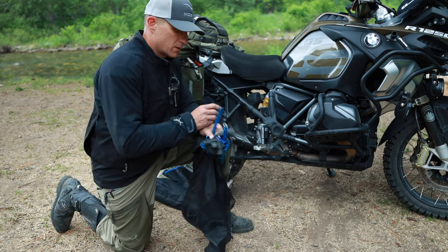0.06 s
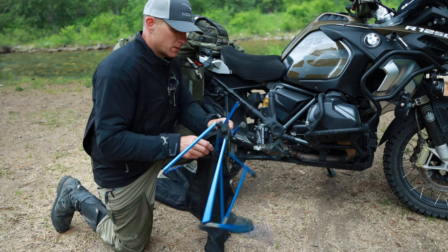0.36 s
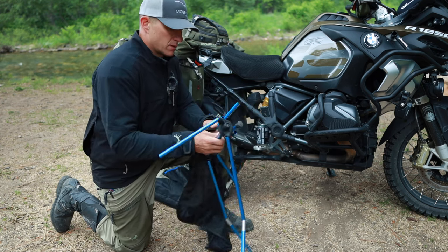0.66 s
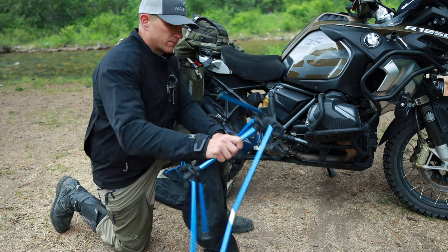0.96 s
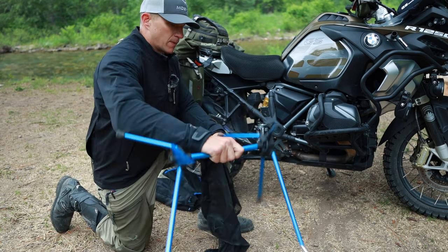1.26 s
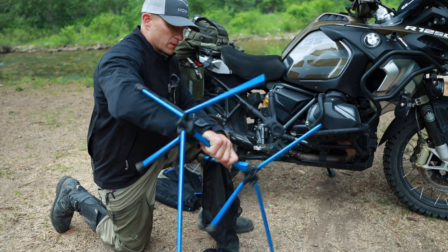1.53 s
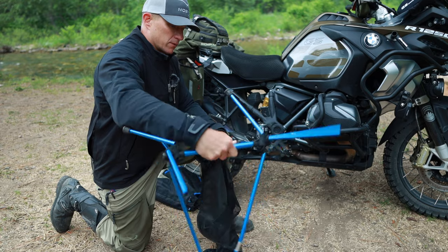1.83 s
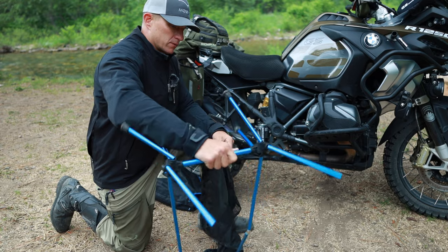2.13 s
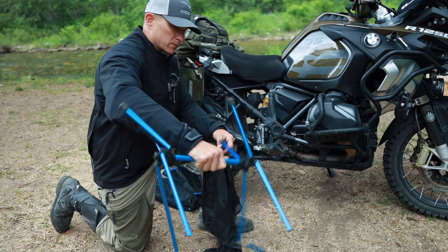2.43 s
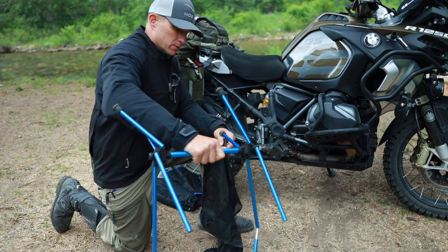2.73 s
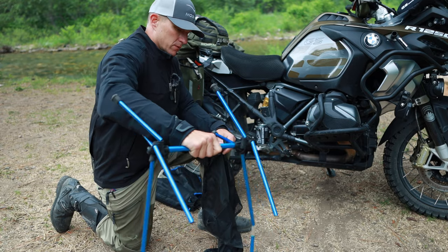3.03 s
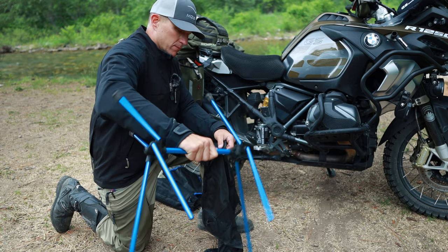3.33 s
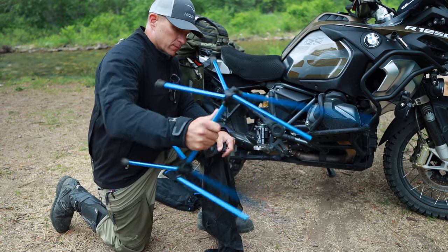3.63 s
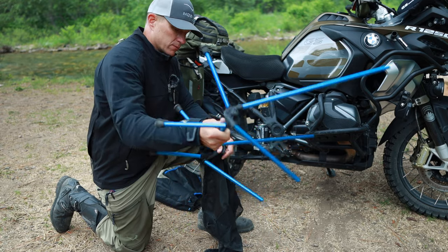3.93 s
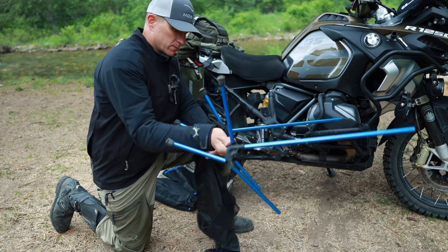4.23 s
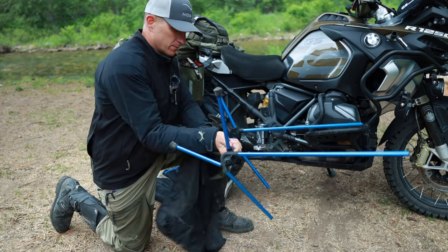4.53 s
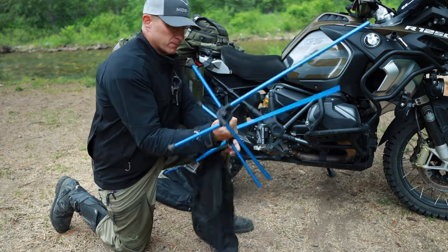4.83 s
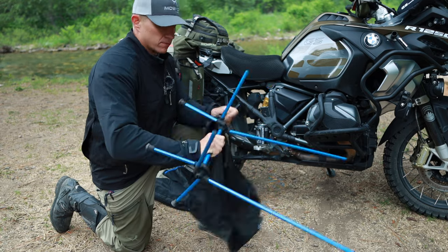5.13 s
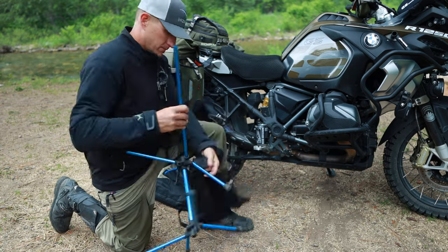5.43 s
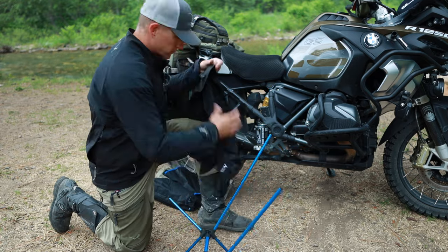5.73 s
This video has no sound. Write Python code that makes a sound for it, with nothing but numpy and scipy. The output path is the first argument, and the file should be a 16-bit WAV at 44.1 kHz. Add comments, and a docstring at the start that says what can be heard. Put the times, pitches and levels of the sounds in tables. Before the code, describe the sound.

A camp chair's frame comes out of a nylon sack with a rustle, brief metallic hisses and light taps. Its aluminium tubes then snap into their sockets one after another, with sharp, dry clicks and a faint ring. After a short lull, cloth rustles again while boots and a knee scuff and thud softly on the ground. The microphone is very close, in a quiet outdoor hush.

```python
"""A brief ringing hiss, a rustle of nylon and light taps: a camp chair's frame leaves its sack, close by.
As it is shaken open, the shock cord snaps each aluminium tube into its socket with a dry click and a
faint ring, echoed by a parked motorcycle. Later, boots and a knee thud softly on the ground.
One microphone stands outdoors in a quiet open-air hush, so near that the loudest clicks overload it."""
import sys
import numpy as np
from scipy import signal
from scipy.fft import rfft, irfft
from scipy.io import wavfile
from scipy.ndimage import uniform_filter1d

SR = 44100
rng = np.random.default_rng(int(sys.argv[2]) if len(sys.argv) > 2 else 0)


def bounce(signal):
    """Save signal as a 16-bit WAV file at the path given by the first command-line argument."""
    frames = np.transpose(np.atleast_2d(signal))
    limited = np.clip(frames, -1, 1)
    pcm = np.round(limited * 32767).astype(np.int16)
    wavfile.write(sys.argv[1], SR, pcm)


N = 263395
TIME = np.arange(N) / SR


def gain_of(db):
    """Decibels to amplitude."""
    return 10 ** (np.asarray(db) / 20)


def unit_rms(x):
    """Scales to rms 1."""
    return x / np.sqrt(np.mean(x ** 2) + 1e-20)


def unit_burst(x):
    """Scales a burst to the energy of 10 ms at rms 1."""
    return x / np.sqrt(np.sum(x ** 2) / (.01 * SR) + 1e-20)


def level(curve):
    """Amplitude at every sample from rows of t/s, level/dB."""
    return gain_of(np.interp(TIME, *np.transpose(curve)))


def add(mix, s, sound):
    """Mixes a sound in at time s."""
    part = mix[max(round(s * SR), 0):][:len(sound)]
    part += sound[:len(part)]


def band(x, low_hz, high_hz, order=2):
    """Causal band-pass."""
    return signal.sosfilt(signal.butter(order, [low_hz, high_hz], "band", fs=SR, output="sos"), x)


def resonate(x, hz, width_hz):
    """One resonance of the given width."""
    r = np.exp(-np.pi * width_hz / SR)
    return signal.lfilter([1, 0, -1], [1, -2 * r * np.cos(2 * np.pi * hz / SR), r * r], x)


def coloured(x, colour):
    """Shapes a spectrum by rows of f/Hz, level/dB; the result has rms 1."""
    hz, db = np.transpose(colour)
    bin_db = np.interp(np.log(np.fft.rfftfreq(N, 1 / SR) + 1), np.log(hz), db)
    return unit_rms(irfft(rfft(x) * gain_of(bin_db), N))


def dying(t, t60):
    """Falls 60 dB in t60 seconds."""
    return np.exp(-np.log(1000) * t / t60)


def waver(depth_db, span_s):
    """A gain that wanders at random."""
    drift = uniform_filter1d(rng.standard_normal(N), int(span_s * SR))
    return gain_of(depth_db * unit_rms(drift))


def rough_noise(depth_db, span_s):
    """Noise of uneven strength."""
    return unit_rms(waver(depth_db, span_s) * rng.standard_normal(N))


def swells(rows, skew, fullness):
    """One arch of amplitude per row: skew under 1 peaks early, fullness over 1 holds the level."""
    out = np.zeros(N)
    for s, length, db in rows:
        arch = abs(np.sin(np.pi * np.linspace(0, 1, round(length * SR)) ** skew))
        add(out, s, gain_of(db) * arch ** (1 / fullness))
    return out


# Brief ringing hisses close by, some just before and around a loud click: t/s, length/s, level/dB
HISSES = [(0, .04, -36.5), (.065, 0.14, -46.5), (.216, .085, -38), (.461, 0.028, -39), (.688, 0.04, -46.5),
          (.895, .08, -55.5), (2.472, .025, -46), (3.222, 0.021, -44.5), (3.267, 0.038, -40.5),
          (3.305, 0.036, -51.5)]
# The resonances in that hiss: f/Hz, width/Hz, level/dB
HISS_MODES = [(2190, 110, -5), (2710, 170, 0.5), (3730, 240, -2), (4350, 260, -9.5), (4800, 250, -4.5),
              (5700, 67, -6), (6760, 70, -17), (7340, 70, -13.5), (9900, 260, -11.5), (14100, 250, -8),
              (15230, 380, -6.5)]


def ringing_hiss():
    """Rough noise sings in metallic resonances, in short swells."""
    noise = rough_noise(depth_db=3.5, span_s=.0015)
    song = sum(gain_of(db) * unit_rms(resonate(noise, hz, width)) for hz, width, db in HISS_MODES)
    return swells(HISSES, skew=.55, fullness=1.4) * unit_rms(song)


# A faint rustling hiss that sinks around the loud clicks and then returns: t/s, level/dB
RUSTLE = [(0, -75), (.75, -57), (1.15, -53.5), (1.55, -67), (2.15, -61), (2.6, -66.5), (3.55, -80),
          (3.72, -64.5), (4.4, -61), (5.97, -61.5)]
# A hand or sleeve drags over the nylon near the microphone: t/s, length/s, level/dB
RUBS = [(0, 0.017, -39.5), (.04, 0.038, -46), (.07, 0.065, -43), (.12, 0.048, -49), (.255, .055, -48),
        (.605, 0.04, -57), (.79, .09, -51), (1.42, .03, -49), (2.005, .03, -64), (2.362, 0.029, -50.5),
        (2.388, 0.029, -48), (2.468, .028, -43), (2.53, 0.035, -51), (2.572, 0.021, -47),
        (3.34, 0.031, -52), (4.43, 0.29, -55), (4.935, .035, -50), (5.04, .11, -54.5), (5.195, 0.097, -50),
        (5.27, 0.11, -53.5), (5.46, 0.068, -52.5), (5.612, 0.054, -44.5), (5.66, 0.11, -54),
        (5.82, 0.18, -51)]
# The nylon's spectrum at the microphone: f/Hz, level/dB
CLOTH_COLOUR = [(100, -18), (400, 1), (900, 3.5), (2200, 4.5), (4000, 0.5), (6000, 0), (8000, -3),
                (12000, -6), (14500, -4.5), (16000, -15)]


def cloth(crackles_per_s=35, crackle_db=15):
    """Rubbed and shaken nylon hisses and its creases crackle, over a faint wavering rustle."""
    friction = rough_noise(depth_db=2.2, span_s=.0015)
    creases = (rng.random(N) < crackles_per_s / SR) * rng.uniform(.2, 1, N)
    crackle = signal.oaconvolve(creases, dying(TIME[:512], t60=.0065))[:N] * rng.standard_normal(N)
    rustle = level(RUSTLE) * waver(depth_db=1, span_s=.073)
    rubs = swells(RUBS, skew=.6, fullness=2.1)
    envelope = np.sqrt(rustle ** 2 + rubs ** 2 + cloth_shake() ** 2)
    return envelope * coloured(friction + gain_of(crackle_db) * crackle, CLOTH_COLOUR)


# The open air all around the microphone: t/s, level/dB
AIR = [(0, -49), (.65, -46.5), (.8, -49.5), (1.3, -52.5), (3.55, -52.5), (3.75, -52), (5.97, -49)]
# Its spectrum: f/Hz, level/dB
AIR_COLOUR = [(15, -85.5), (25, -46.5), (108, -14), (145, -6.5), (200, -4.5), (363, 0), (427, -4),
              (560, -7), (695, -9), (988, -10.5), (5140, -23.5), (5880, -27.5), (7110, -29.5),
              (11300, -33.5), (16000, -37)]


def air():
    """A quiet outdoor hush, strongest in the low middle."""
    return level(AIR) * coloured(rough_noise(depth_db=1, span_s=.036), AIR_COLOUR)


def contact(chatter_s):
    """One sharp impact, then a brief chatter of metal."""
    t = TIME[:2048]
    rattle = rng.standard_normal(len(t)) * dying(np.maximum(t - chatter_s, 0), t60=.0082)
    impact = 1. * (t == 0)
    return unit_burst(rattle) + .5 * unit_burst(impact)


def click(chatter_s, pitches, knock_db, hub_db, rim_db, purity_db=0, sizzle_db=2):
    """A tube strikes: a low knock, and hub, socket and rim each resonate purity_db over a broad skirt."""
    blow = contact(chatter_s)  # shared by plastic hub and tube rim; the socket rattles by itself
    knock = unit_burst(band(blow, 350, 630)) + unit_burst(band(contact(chatter_s), 820, 1200))
    hub = band(blow, 1450, 2700, order=3)
    socket = band(contact(chatter_s), 2550, 5400, order=3)
    rim = band(blow, 4300, 10800, order=3) + gain_of(sizzle_db) * band(blow, 13800, 17500)
    out = gain_of(knock_db) * unit_burst(knock)
    for skirt, hz, db in zip([hub, socket, rim], pitches, [hub_db, 0, rim_db]):
        core = unit_burst(resonate(contact(chatter_s), hz, width_hz=260))
        out += gain_of(db) * unit_burst(unit_burst(skirt) + gain_of(purity_db) * core)
    return out


# The modes of a struck tube: f/Hz, level/dB, t60/s
TUBE_MODES = [(2590, -15.5, 0.061), (4190, -6, .045), (4790, -11.5, 0.048), (6700, -17.5, 0.083),
              (7194, -11, 0.088), (9500, -13, 0.083), (13750, 3, 0.082), (13800, -6.5, 0.14),
              (14300, -8.5, 0.092), (15100, -5, .05)]


def ring(tubes=6, detune=.013):
    """The joined tubes ring together, each tuned a little differently, so every mode shimmers."""
    t = TIME[:SR // 10]
    hz, db, t60 = np.transpose(TUBE_MODES)[:, :, None]
    mistuning, phase = rng.standard_normal((2, tubes, len(TUBE_MODES), 1))
    turns = hz * (1 + detune * mistuning) * t + phase
    clusters = np.sin(2 * np.pi * turns).sum(0) / np.sqrt(tubes)
    return (gain_of(db) * dying(t, t60) * clusters).sum(0)


# Loose tubes knock together at close range: t/s, chatter/s, level/dB, f/Hz, brightness/dB
TAPS = [(.0045, 0.0036, -29.5, 2830, 2.5), (0.0212, .001, -42, 2900, -5), (.0535, 0.0023, -38, 3900, -2),
        (.068, 0.0012, -29, 2950, 1), (0.0989, .0003, -39.5, 4600, 9.5), (0.108, .0006, -41, 4530, 15),
        (0.1523, 0.0045, -45.5, 2850, -9), (0.2222, .002, -36, 4430, 0), (0.2437, 0.0018, -40, 4580, -1),
        (.3074, .0003, -35.5, 4580, 7), (0.3323, 0.0042, -30, 3600, 0.5), (.3432, .0003, -41.5, 2700, -14),
        (0.4283, .003, -43, 3700, -2), (0.5127, 0.0051, -37, 2680, -13), (.529, .0003, -43, 3080, -7),
        (.6905, 0.0016, -41, 3100, 7), (0.7392, .0005, -48, 3890, 0), (.7956, 0.00035, -42, 2650, -11),
        (0.8268, 0.0018, -50, 2630, -13), (0.9033, 0.00065, -42, 3150, 3.5), (0.928, .0003, -44, 4360, 15),
        (1.027, 0.00014, -31.5, 3740, 7), (1.105, 0.0027, -39, 3150, -1.5),
        (1.218, 0.0022, -34.5, 3950, -4.5), (2.0253, .0008, -50.5, 2430, 4), (2.285, .001, -38.5, 3790, 0),
        (2.6683, .0003, -50.5, 3040, -8.5), (4.6536, 0.0012, -43.5, 2580, -12.5),
        (4.9406, 0.0024, -62, 2880, -9), (5.208, 0.0024, -49.5, 2900, -8)]


def taps(hub_hz=2000, rim_ratio=2.12, ring_db=-25):
    """Light knocks between tubes; a bright, glancing one sounds more in the rim and less in the hub."""
    out = np.zeros(N)
    for s, chatter_s, db, hz, bright_db in TAPS:
        loss_db = .7 * bright_db
        tap = click(chatter_s, [hub_hz, hz, hz * rim_ratio],
                    knock_db=-12.5 - loss_db, hub_db=-5 - loss_db, rim_db=-8.5 + bright_db)
        add(out, s, gain_of(db) * tap)
        add(out, s, gain_of(db + ring_db + bright_db) * ring())
    return out


# Tubes seat right by the microphone: t/s, chatter/s, level/dB, hub f/Hz, socket f/Hz, rim f/Hz,
# knock/dB, hub/dB, rim/dB (these three relative to the level), purity/dB, ring level/dB
SNAPS = [(0.1318, 0.00057, -28.5, 2140, 2880, 6060, -26, -5, -1, .5, -56),
         (0.209, .0004, -26, 2120, 2800, 7100, -22, -23, -0.5, 0, -32),
         (.4202, 0.00077, -29.5, 2590, 3600, 8770, -22, -3.5, -4, 5, -46.5),
         (.469, 0.002, -23, 1930, 3370, 6900, -13.5, -1.5, -7.5, -10, -58),
         (.491, 0.0039, -18.5, 1950, 4850, 8270, -17, 1, -6, -4, -53),
         (0.5713, .001, -19, 1580, 3460, 6100, -11.5, -5, -2, -2, -45),
         (0.6419, .0003, -31, 2130, 3300, 6940, -14, -9, -4, 1, -42),
         (0.6587, 0.0033, -15.5, 1800, 3620, 6370, -17, -4, -8.5, 0.5, -31),
         (1.1231, 0.0014, -17, 1520, 3250, 6700, -33, -16.5, -2, 2, -42),
         (1.1938, 0.00062, -11.5, 1683, 4320, 9910, -14.5, -4.5, -6, 0, -20),
         (1.4512, 0.0022, -18, 2100, 2880, 6610, -17, -9.5, -8.5, -4.5, -47),
         (1.9123, 0.00087, -12.5, 2430, 4020, 7110, -30, -10, -10.5, 4.5, -41),
         (2.4978, .002, -12, 2020, 3150, 9250, -18, -3.5, -3, -3, -49.5),
         (3.2337, 0.0025, -15.5, 2010, 3800, 9640, -17, -4.5, -3.5, -3, -45),
         (3.2793, 0.0003, -12.5, 2150, 3420, 9700, -22, -4, -9, -4.5, -35)]


def snaps():
    """The shock cord pulls each tube home with a click, and the frame rings."""
    out = np.zeros(N)
    for s, chatter_s, db, *pitches, knock_db, hub_db, rim_db, purity_db, ring_db in SNAPS:
        add(out, s, gain_of(db) * click(chatter_s, pitches, knock_db, hub_db, rim_db, purity_db))
        add(out, s, gain_of(ring_db) * ring())
    return out


def cloth_shake(relative_db=-42):
    """Amplitude of the rustle that each snap shakes out of the nylon."""
    out = np.zeros(N)
    for s, _, db, *_ in SNAPS:
        add(out, s, gain_of(db + relative_db) * dying(TIME[:SR], t60=.35))
    return out


# Low notes from the nearby frame: t/s, f/Hz, level/dB
FLEXES = [(.308, 1035, -36), (.334, 1016, -47), (.421, 990, -38), (.47, 358, -40), (.493, 423, -31.5),
          (.573, 442, -30), (.66, 426, -34.5), (.691, 457, -32.5), (.796, 930, -34.5), (0.828, 1056, -36.5),
          (.941, 893, -42), (1.219, 950, -40)]


def flexes(cycles=45):
    """A free length of tube flexes after a blow, dying by 60 dB over the given cycles."""
    out, t = np.zeros(N), TIME[:SR // 4]
    for s, hz, db in FLEXES:
        tone = np.sqrt(2) * np.sin(2 * np.pi * hz * t)
        add(out, s, gain_of(db) * dying(t, cycles / hz) * tone)
    return out


# Scuffs around the chair: t/s, length/s, f/Hz, width/Hz, level/dB
SCUFFS = [(0.367, 0.0074, 11000, 7000, -44), (0.77, .2, 14800, 1500, -52), (2.258, 0.012, 8000, 9000, -52),
          (4.42, 0.048, 15000, 2000, -54), (5.006, 0.029, 1800, 2500, -54.5),
          (5.065, .098, 2000, 1500, -55.5), (5.232, 0.035, 1270, 2000, -50.5),
          (5.617, .013, 13800, 2500, -49), (5.616, .04, 5100, 700, -46.5),
          (5.901, 0.025, 1350, 1180, -46.5)]


def scuffs():
    """A boot scrapes on grit, or nylon on itself, in a short swell of friction noise."""
    out = np.zeros(N)
    friction = rough_noise(depth_db=2.2, span_s=.0015)
    for s, length, hz, width, db in SCUFFS:
        stroke = resonate(friction[round(s * SR):][:round(length * SR)], hz, width)
        add(out, s, gain_of(db) * unit_rms(stroke) * signal.windows.cosine(len(stroke)))
    return out


# Thuds on the ground below the microphone: t/s, f/Hz, level/dB
THUDS = [(.985, 150, -51), (4.441, 103, -59), (4.886, 60, -68), (4.939, 168, -42), (5.025, 136, -45),
         (5.201, 60, -60), (5.243, 250, -50), (5.36, 86, -55), (5.631, 171, -47), (5.735, 260, -46.5),
         (5.908, 160, -52)]


def thuds():
    """Boot and knee meet the ground in soft low pushes that die within a few cycles."""
    out, t = np.zeros(N), TIME[:SR // 6]
    for s, hz, db in THUDS:
        push = rng.standard_normal(len(t)) * t * dying(t, t60=.023)
        add(out, s, gain_of(db) * unit_burst(band(push, hz * .53, hz * 1.33)))
    return out


def surroundings(x, echo_s=.0031, echo_db=-9, scatter_db=-13, tail_db=-41):
    """An echo off the motorcycle, quick scatter from ground and body, a faint tail from farther trees."""
    t = TIME[:SR // 2]
    scatter, tail = rng.standard_normal((2, len(t)))
    scatter *= dying(t, t60=.034) * (t > .002)
    tail = band(tail, 300, 9000, order=1) * dying(t, t60=.3) * (t > .012)
    response = gain_of(scatter_db) * scatter / np.linalg.norm(scatter)
    response += gain_of(tail_db) * tail / np.linalg.norm(tail)
    response[0] += 1  # the direct path
    response[round(echo_s * SR)] += gain_of(echo_db)  # a path about a metre longer
    return signal.fftconvolve(x, response)[:N]


def scene():
    """The frame with its reflections, the cloth, the air and the ground, heard from one spot in mono."""
    metallic = ringing_hiss() + taps() + snaps() + flexes()
    return (surroundings(metallic) + cloth() + air() + scuffs() + thuds())[None]


def record(dry, cutoff_hz=16100):
    """The microphone clips the loudest clicks, sooner on one side, adding a low thump; then a low-pass."""
    clipped = np.clip(dry, -1.05, .75)
    low_pass = signal.firwin(511, cutoff_hz, window=("kaiser", 8), fs=SR)
    return signal.oaconvolve(clipped, low_pass[None], "same")


dry = scene()
out = record(dry)
bounce(out)
```